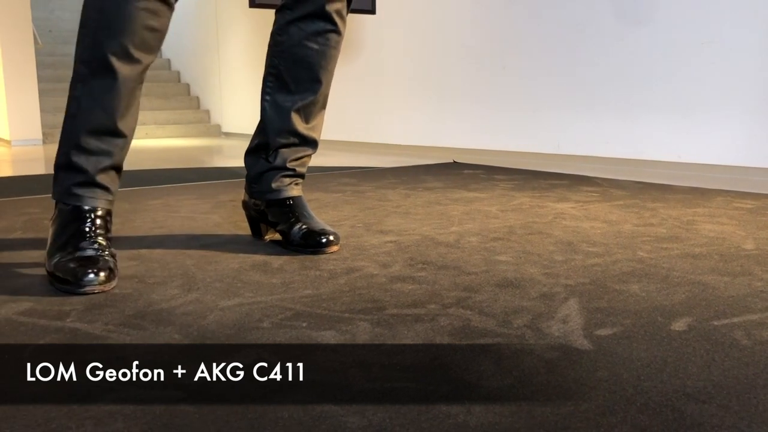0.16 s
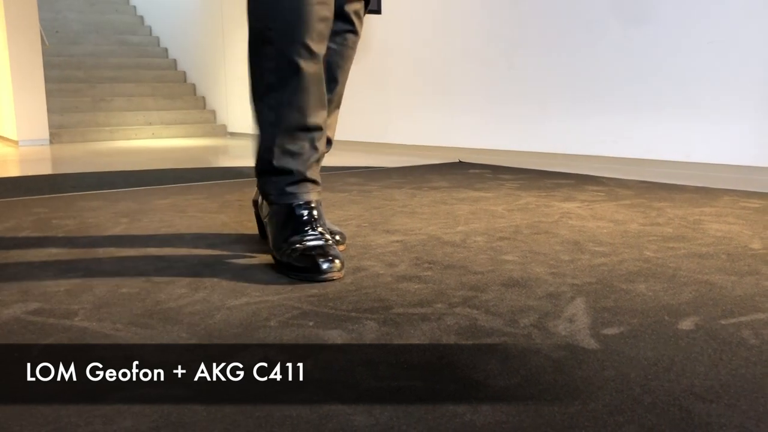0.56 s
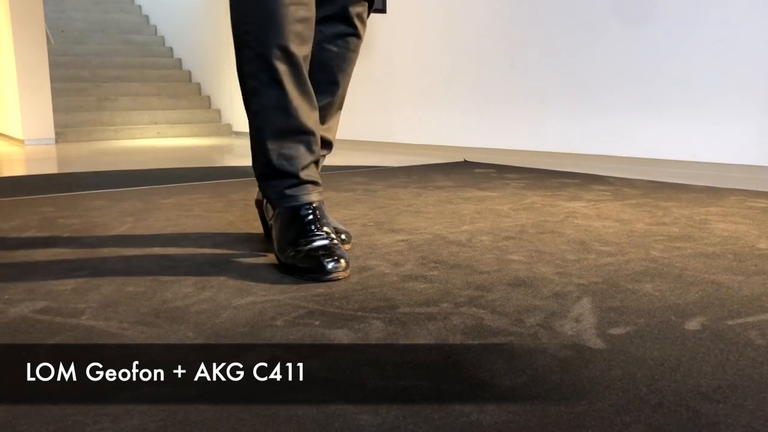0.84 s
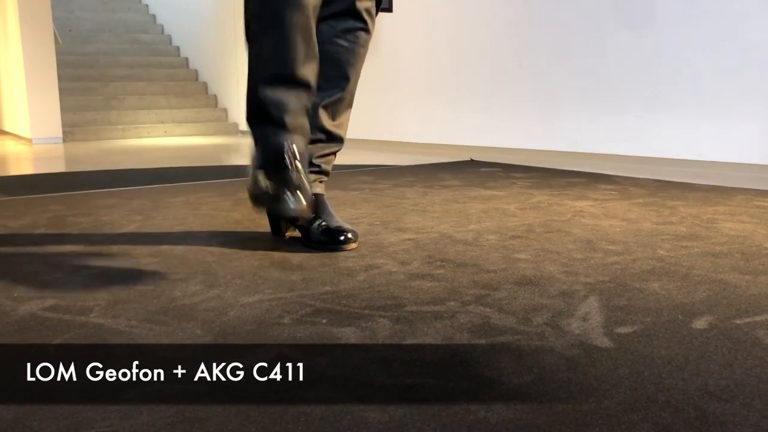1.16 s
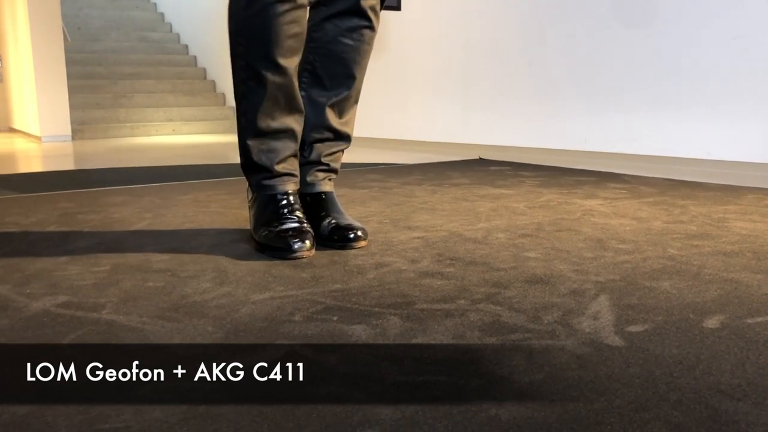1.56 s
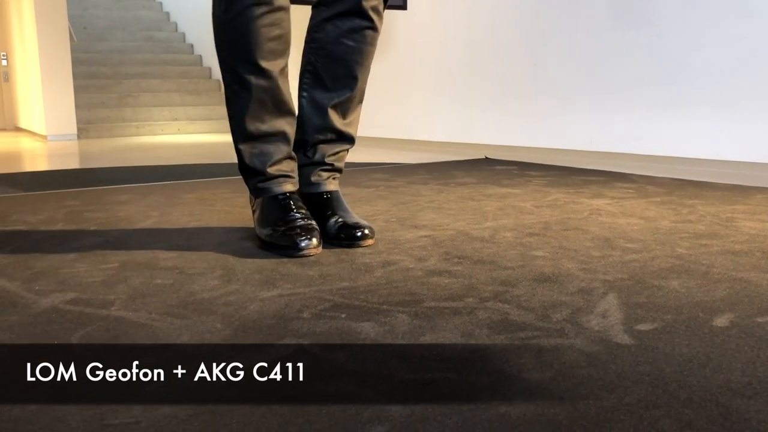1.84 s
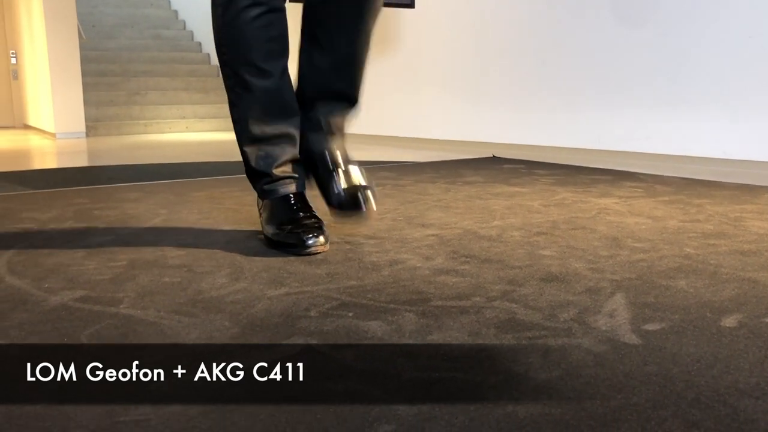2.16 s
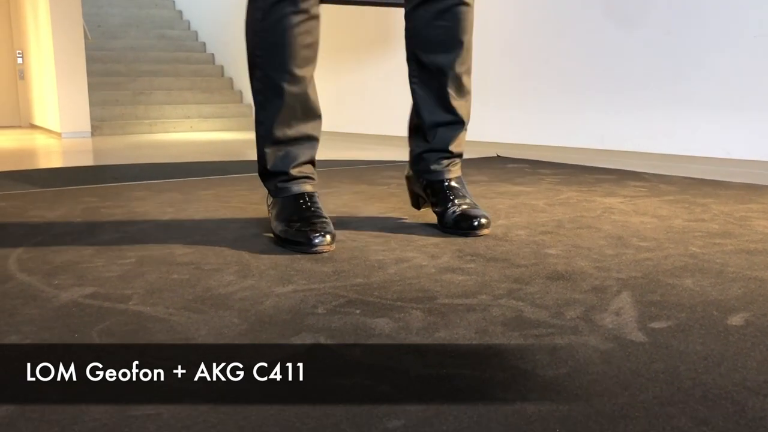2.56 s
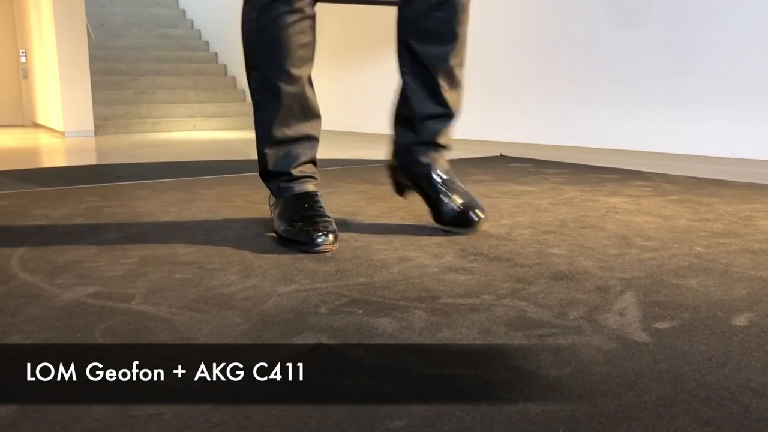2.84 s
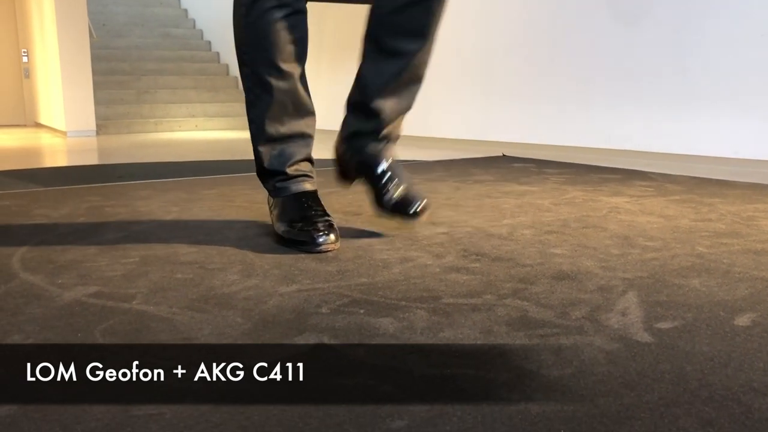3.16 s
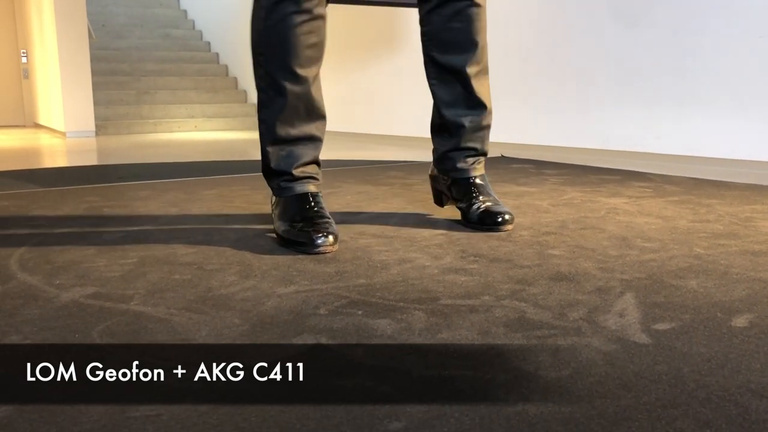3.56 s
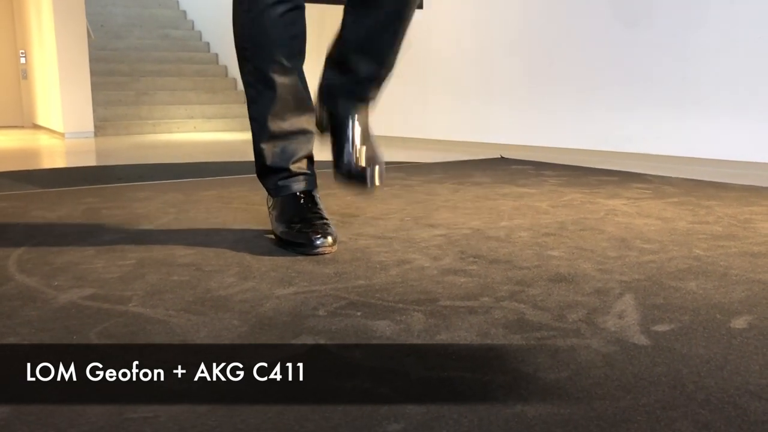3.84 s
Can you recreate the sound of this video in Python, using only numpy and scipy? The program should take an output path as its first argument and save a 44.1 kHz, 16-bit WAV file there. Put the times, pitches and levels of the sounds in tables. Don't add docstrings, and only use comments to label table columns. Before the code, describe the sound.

Hard-soled shoes stamp on a loose wooden panel, heard through contact pickups. A stamp's tail opens; sharp knocks with plate cracks and low, wobbling thumps land at 0.57, 1.43, 2.25, 2.53 (softest), 3.07, 3.36 and 3.93 seconds, the last hard and cut short. Between them come faint scuffs near 1.05 and 2.86, soft low steps around 1.0 and 1.9-2.0, tiny ticks and quiet rumble.

```python
import sys
import numpy as np
from scipy import signal
from scipy.io import wavfile

SR = 44100
rng = np.random.default_rng(int(sys.argv[2]) if len(sys.argv) > 2 else 0)


def digitize_waveform(pressure):
    field = np.atleast_2d(pressure).T
    bounded = np.clip(field, -1, 1)
    quanta = np.round(bounded * 32767).astype(np.int16)
    wavfile.write(sys.argv[1], SR, quanta)


def ratio_of_db(decibels):
    return 10 ** (np.asarray(decibels, float) / 20)


N = 176400

# start in seconds, peak in dB, knock in Hz, low shudder in dB, high buzz in dB.
STAMPS = [
    (-.04, -4, 890, -29, -63.5),
    (0.5669, -8.5, 1068, -25.5, -52.5),
    (1.4251, -10, 1047, -23.5, -48.5),
    (2.2524, -12.5, 850, -29, -59.5),
    (2.5323, -18, 878, -26, -56),
    (3.073, -11, 907, -26.5, -53.5),
    (3.3638, -13.5, 1150, -25, -58),
    (3.9326, -8.5, 1098, -25, -48.5),
]
KNOCK_EDGES_DB = [-15, -18.5, -16, -30, -31.5, -23, -19.5, -10]
# frequency in Hz, level in dB, T60 in seconds.
PANEL_MODES = [(280, -8.5, .05), (315, 2, 0.03), (454, -4, 0.0083), (667, -11, 0.075), (966, -6, 0.023)]
# frequency in Hz, density in dB per Hz.
SHUDDER_SPECTRUM = [(26, -30), (45, 5.5), (190, -1.5), (1340, -28.5), (3290, -37.5), (6080, -36.5),
                    (12600, -67), (16400, -87.5), (22000, -120)]
# frequency in Hz, T60 in seconds.
SHUDDER_T60 = [(100, 0.59), (250, 0.25), (600, .2), (1500, 0.12), (4000, 0.36), (14000, .14)]
# start in seconds, level in dB, frequency in Hz, T60 in seconds.
RINGS = [(.5675, -32.5, 612, 0.12), (.5675, -25.5, 1076, 0.039), (.582, -32.5, 1320, 0.049),
         (.619, -38, 1412, 0.056), (1.426, -25, 1174, 0.033), (1.426, -27.5, 524, 0.093),
         (1.426, -31, 928, 0.089), (2.2535, -20, 567, 0.062), (2.2535, -23.5, 1248, 0.018),
         (2.258, -34.5, 2177, 0.019), (2.297, -38, 1560, 0.018), (2.533, -22, 559.4, 0.073),
         (2.534, -30, 1193, 0.08), (2.541, -20.5, 600, 0.072), (2.576, -36.5, 1640, 0.022),
         (3.074, -24, 548, 0.11), (3.074, -31, 1200, 0.055), (3.365, -20, 557.4, 0.067),
         (3.365, -21, 700, 0.049), (3.365, -32.5, 1127, 0.05), (3.407, -40, 2277, 0.015),
         (3.934, -22, 562, 0.11), (3.934, -28.5, 1110, 0.046), (1.532, -57.5, 790, 0.35),
         (2.54, -66, 950, .9), (2.885, -76.5, 1190, 0.44), (3.08, -60, 800, .6), (2.657, -45.5, 620, 0.031),
         (3.83, -66.5, 360, .6), (3.688, -59.5, 700, .06), (1.883, -58, 545, 0.047),
         (1.964, -50.5, 367, .07), (1.98, -68.5, 588, 0.11)]
# centre in seconds, peak in dB, frequency in
# Hz.
HEAVES = [(.058, -26, 95), (0.101, -29.5, 107), (0.578, -43, 109), (0.6, -46, 120), (0.652, -17, 78),
          (0.694, -23, 81), (.726, -27.5, 90), (1.444, -20.5, 130), (1.462, -37, 129), (1.504, -46.5, 114),
          (1.553, -20, 79.6), (1.584, -31, 87.8), (1.533, -32, 376), (1.881, -48.5, 301), (1.887, -59, 514),
          (.004, -18.5, 66), (0.0203, -33.5, 127), (0.0134, -37, 150), (2.266, -17.5, 133.3),
          (2.286, -32, 107.9), (2.333, -20.5, 81.5), (2.38, -30.5, 93.2),
          (2.569, -23, 119), (2.614, -18.5, 90.5), (2.653, -24.5, 94), (2.661, -41.5, 318),
               (2.687, -30, 92.3), (3.092, -25, 117), (3.111, -28.5, 98.7), (3.155, -21.5, 95),
               (3.201, -24, 82.9), (3.238, -37.5, 81), (3.388, -30, 116), (3.42, -18.5, 104),
               (3.443, -17.5, 84), (3.485, -23, 88), (3.52, -26.5, 86.5), (3.624, -50, 419),
               (3.944, -30, 137), (3.969, -17.5, 130), (3.996, -24, 112)]
# start in seconds, peak in dB, dull part in dB.
CRACKS = [(0.0004, -44.5, -38.5), (0.0186, -53, -71), (0.0319, -46, -33.5), (0.035, -56, -44),
          (0.055, -62, -70), (0.5651, -39, -21.5), (0.5758, -35.5, -23), (0.5806, -39.5, -28.5),
          (0.6115, -52.5, -39.5), (0.617, -54, -39.5), (0.6267, -44, -30), (0.6467, -53.5, -37),
          (0.6679, -46, -38), (1.4242, -26, -21), (1.4323, -20.5, -22.5), (1.5084, -52, -63),
          (1.5232, -51, -34.5), (1.5316, -38, -30), (2.2565, -25, -35.5), (2.2967, -38, -34.5),
          (2.3244, -65, -66), (2.3605, -58.5, -75), (2.5375, -20.5, -22.5), (2.5615, -46.5, -42.5),
          (2.577, -39.5, -53), (2.585, -44.5, -30.5), (2.62, -56, -42), (2.6446, -62, -54.5),
          (2.6863, -64.5, -69),
          (3.0794, -22.5, -23.5), (3.1134, -35.5, -34), (3.1488, -44.5, -73), (3.1739, -51, -88),
               (3.363, -36.5, -30), (3.3689, -23, -24.5), (3.407, -44, -39.5), (3.3942, -28.5, -45),
               (3.4175, -44.5, -30), (3.453, -74, -40.5), (3.487, -58, -71.5), (3.5124, -60.5, -61),
               (3.931, -18, -17), (3.9366, -32.5, -19), (3.9628, -39, -26)]
# frequency in Hz, width in Hz, level in dB.
PLATE_MODES = [(4210, 390, -8.5), (6390, 280, -9)]
# start in seconds, peak in dB, frequency in Hz, T60 in seconds.
STEPS = [(0.244, -52, 184.2, 0.35), (0.25, -42, 71.6, 0.53), (.415, -58.5, 150, .4),
         (0.511, -54.5, 185, 0.3), (1.024, -42, 150, 0.32), (1.244, -65, 120, 0.32),
         (1.885, -47.5, 131.9, 0.67), (1.964, -42.5, 185, 0.29), (1.973, -44.5, 125, 0.41),
         (1.998, -44, 165, .3), (2.05, -45.5, 140, .2), (1.982, -50.5, 75, 0.99), (1.882, -49, 190, 0.16),
         (2.48, -44.5, 100.7, 0.12), (2.83, -48, 97.7, 0.37), (3.69, -59, 270, 0.29),
         (3.619, -45, 74, 0.26), (2.836, -47, 186.5, 0.25)]
# end in seconds, swell in seconds, level in dB.
SCUFFS = [
    (0.041, 0.007, -45),
    (0.288, 0.032, -59),
    (1.05, 0.033, -50.5),
    (2.005, 0.026, -64),
    (2.864, 0.033, -59.5),
    (3.692, 0.021, -55.5),
]
# frequency in Hz, density in dB per Hz.
SCUFF_SPECTRUM = [(180, -0.5), (300, -7), (800, -19.5), (1760, -27.5), (6860, -39.5), (12600, -66),
                  (16400, -84), (22000, -120)]
# start in seconds, peak in dB, frequency in Hz.
TICKS = [(.2618, -63.5, 4300), (0.4698, -66.5, 5010), (.508, -69.5, 4980), (.5506, -75, 5000),
         (.6864, -64, 4490), (0.703, -68, 3513), (0.7229, -64, 3500), (.7842, -74.5, 3020),
         (.857, -67.5, 2996), (1.1527, -64.5, 3048), (1.713, -63, 2870), (1.8794, -69.5, 2000),
         (1.929, -76, 5580), (1.9796, -75.5, 2800), (2.816, -65, 2863), (2.8389, -64.5, 2540),
         (3.0089, -69, 2000), (3.4981, -63, 2260), (3.5298, -67, 3990), (3.6593, -62, 2903)]
# frequency in Hz, level in dB.
SLAB_MODES = [(95, -44), (158, -49), (196, -49)]
# frequency in Hz, density in dB per Hz.
FLOOR_SPECTRUM = [(20, -11), (81, -3), (150, -5.5), (330, -23), (600, -28.5), (1200, -37.5), (12600, -61),
                  (16400, -89)]
# frequency in Hz, level in dB.
HUMS = [(1180, -99)]

STAMP_S = np.array(STAMPS)[:, 0]
KNOCK_WIDTH_CYCLES, KNOCK_EDGE_RATIO, KNOCK_RING_DB = 0.51, 2.4, -13.5
SPLIT_HZ, RISE_CYCLES, HOLD_S = 2200, 0.26, 0.027
PLATE_LAG_S, EARLY_BUZZ_DB, BUZZ_END_S = 0.005, -11, 0.042
LUMPS_PER_S, LUMPS_DB = 90, 3.6
RING_LONG_S, RING_LONG_DB, RING_FLUTTER_HZ, RING_FLUTTER = 0.3, -3, 35, 0.8
HEAVE_WIDTH_CYCLES, HEAVE_TRIM_DB = 0.65, 1.5
STEP_RISE_CYCLES, STEP_WOBBLE, STEP_GLIDE, STEP_GLIDE_S = 0.61, 0.25, 0.35, 0.012
SCUFF_END_S = 0.0037
TICK_T60_S, TICK_SPREAD_HZ, TICK_RING_DB = 0.011, 2200, -8
HALL_DB, HALL_T60_S, HALL_LOW_HZ, HALL_HIGH_HZ, SLAB_T60_S = -87.5, 1.9, 279, 2000, 0.37
HALL_PEAK_HZ, HALL_FALL_DB, HALL_SKIRT_HZ = 1200, 9, 600
HALL_FOLLOWS = 0.6
FLOOR_DB = -71.5
PICKUP_LOW_HZ, PICKUP_HIGH_HZ = 58, 12800


def rms_one(x):
    return x / np.sqrt(np.mean(x ** 2) + 1e-20)


def at_hz(points, hz):
    table = np.array(points)
    return np.interp(np.log(hz), np.log(table[:, 0]), table[:, 1])


def band(x, low_hz, high_hz):
    edges = [low_hz, min(high_hz, .45 * SR)]
    return signal.sosfilt(signal.butter(2, edges, "band", fs=SR, output="sos"), x)


def drift(rate):
    r = np.exp(-2 * np.pi * rate / SR)
    return rms_one(signal.lfilter([1], [1, -2 * r, r * r], rng.standard_normal(N + SR))[SR:])


def add(out, s, shape, before_s, after_s):
    i = np.arange(max(int((s - before_s) * SR), 0), min(int((s + after_s) * SR), N))
    out[i] += shape(i / SR - s)


def tone(hz, t):
    return np.sin(2 * np.pi * hz * t)


def dying(t, t60):
    return (t >= 0) * ratio_of_db(-60 * np.maximum(t, 0) / t60)


def bands(spectrum):
    edges = 28 * 2 ** np.arange(0, 9.6, .5)
    white = rng.standard_normal((2, N))
    centres = np.sqrt(edges[1:] * edges[:-1])
    noise = []
    for k, hz in enumerate(centres):
        noise.append(ratio_of_db(at_hz(spectrum, hz)) * band(white[k % 2], edges[k], edges[k + 1]))
    return centres, noise


def knocks():
    out = np.zeros(N)
    chance = rng.standard_normal((len(STAMPS), 2 * len(PANEL_MODES)))
    for (s, db, hz, _, _), edge_db, c in zip(STAMPS, KNOCK_EDGES_DB, chance):
        def dent(t):
            edge = ratio_of_db(edge_db) * np.cos(2 * np.pi * KNOCK_EDGE_RATIO * hz * t)
            pulse = np.exp(-(t * hz / KNOCK_WIDTH_CYCLES) ** 2)
            return -ratio_of_db(db) * (np.cos(2 * np.pi * hz * t) + edge) * pulse

        add(out, s, dent, .005, .005)
        for k, (mode_hz, mode_db, t60) in enumerate(PANEL_MODES):
            level = ratio_of_db(max(db, -12) + KNOCK_RING_DB + mode_db + 2 * c[k])
            struck_hz = mode_hz * (1 + .05 * c[-k - 1])
            add(out, s, lambda t: level * dying(t, t60) * (1 - np.exp(-(t / 0.00038) ** 2))
                * tone(struck_hz, t), 0, 2 * t60)
    return out


def shudder():
    hz, noise = bands(SHUDDER_SPECTRUM)
    low = hz < SPLIT_HZ
    out, lumps = np.zeros(N), drift(LUMPS_PER_S)
    high_scale = np.std(sum(n for n, is_low in zip(noise, low) if not is_low))
    low_scale = np.std(sum(n for n, is_low in zip(noise, low) if is_low))
    for f, n, is_low in zip(hz, noise, low):
        env, t60 = np.zeros(N), at_hz(SHUDDER_T60, f)
        rise = RISE_CYCLES / f + 0.00028
        for s, _, _, low_db, high_db in STAMPS:
            def swell_and_fall(t):
                fall_db = -60 * np.maximum(t - HOLD_S, 0) / t60
                if is_low:
                    level_db = low_db + fall_db
                else:
                    level_db = high_db + EARLY_BUZZ_DB * (t < PLATE_LAG_S) + fall_db - (t / BUZZ_END_S) ** 3
                return ratio_of_db(level_db) * (1 - np.exp(-t / rise))

            add(env, s, swell_and_fall, 0, 0.71 * t60)
        lumpy = ratio_of_db(LUMPS_DB * lumps * min(f / 1000, 1))
        out += env * n / (low_scale if is_low else high_scale) * lumpy
    return out


def rings():
    short, long = np.zeros(N), np.zeros(N)
    for s, db, hz, t60 in RINGS:
        add(long if t60 > RING_LONG_S else short, s,
            lambda t: ratio_of_db(db) * dying(t, t60) * (1 - np.exp(-t * hz)) * tone(hz, t), 0, 2 * t60)
    flutter = 1 + RING_FLUTTER * drift(RING_FLUTTER_HZ)
    return short + long * flutter * ratio_of_db(RING_LONG_DB)


def heaves():
    out = np.zeros(N)
    for s, db, hz in HEAVES:
        add(out, s, lambda t: ratio_of_db(db + HEAVE_TRIM_DB) * tone(hz, t)
            * np.exp(-(t * hz / HEAVE_WIDTH_CYCLES) ** 2), .04, .04)
    return out


def crack_part(low_hz, high_hz, t60, trim_db, dull=False, slope=1):
    env = np.full(N, 1e-9)
    for s, db, dull_db in CRACKS:
        nearest = np.abs(STAMP_S - s).argmin()
        alone = abs(STAMP_S[nearest] - s) > .003
        if dull and not alone:
            continue
        start = s if alone else STAMP_S[nearest] - 1 / 2000
        level = ratio_of_db((dull_db if dull else db) * slope + trim_db)
        fall_s = t60 if alone else .25 * t60
        add(env, start, lambda t: level * dying(t, fall_s), 0, 1.4 * t60)
    return band(env * rng.standard_normal(N), low_hz, high_hz) * np.sqrt(SR / 2 / (high_hz - low_hz))


def cracks():
    dull = crack_part(800, 2020, t60=.04, trim_db=-11, dull=True)
    middle = crack_part(2450, 5900, t60=.026, trim_db=-10)
    bright = crack_part(7500, 30000, t60=.012, trim_db=-13, slope=1.3)
    out = dull + middle + bright
    for hz, width, db in PLATE_MODES:
        out += ratio_of_db(db) * 2 * band(middle, hz - width / 2, hz + width / 2)
    return out


def steps():
    out = np.zeros(N)
    for s, db, hz, t60 in STEPS:
        def push(t):
            glide = STEP_GLIDE * STEP_GLIDE_S * np.exp(-t / STEP_GLIDE_S)
            return ratio_of_db(db) * (1 - np.exp(-t * hz / STEP_RISE_CYCLES)) * dying(t, t60) * tone(hz, t - glide)

        add(out, s, push, 0, t60)
    return out * (1 + STEP_WOBBLE * drift(30) + 0.19 * drift(55))


def scuffs():
    env = np.zeros(N)
    for s, swell, db in SCUFFS:
        add(env, s, lambda t: ratio_of_db(db) * np.where(t < 0, np.exp(-(t / swell) ** 2), np.exp(-t / SCUFF_END_S)),
            3 * swell, .04)
    grain = ratio_of_db(2.5 * drift(300))
    return env * grain * rms_one(sum(bands(SCUFF_SPECTRUM)[1]))


def ticks():
    ring, puff = np.zeros(N), np.zeros(N)
    for s, db, hz in TICKS:
        add(puff, s, lambda t: ratio_of_db(db) * dying(t, TICK_T60_S) * tone(hz, t), 0, .03)
        add(ring, s, lambda t: ratio_of_db(db + TICK_RING_DB) * dying(t, 2 * TICK_T60_S) * tone(hz, t), 0, .05)
    return ring + puff * rms_one(band(rng.standard_normal(N), 67, TICK_SPREAD_HZ))


def hall():
    modes = []
    for hz in np.linspace(HALL_LOW_HZ, HALL_HIGH_HZ, num=24) + rng.uniform(-30, 30, 24):
        skirt_hz = 550 if hz > HALL_PEAK_HZ else HALL_SKIRT_HZ
        modes.append((hz, HALL_DB - HALL_FALL_DB * ((hz - HALL_PEAK_HZ) / skirt_hz) ** 2, HALL_T60_S))
    modes += [(hz, db, SLAB_T60_S) for hz, db in SLAB_MODES]
    out, chance = np.zeros(N), rng.standard_normal((len(STAMPS), len(modes)))
    buzz_db = HALL_FOLLOWS * (np.array(STAMPS)[:, 4] + 55)
    at = ((STAMP_S + 1.01) * SR).astype(int)
    for (hz, db, t60), c in zip(modes, chance.T):
        clicks = np.full(N + SR, 1e-18)
        clicks[at] = ratio_of_db(db + (hz > 250) * buzz_db) * (1 + .5 * c)
        r, w = ratio_of_db(-60 / (t60 * SR)), 2 * np.pi * hz / SR
        resonator = [1, -2 * r * np.cos(w), r * r]
        out += signal.lfilter([0, np.sin(w)], resonator, clicks[SR // 2:])[SR // 2:]
    return out


def floor():
    out = ratio_of_db(FLOOR_DB) * rms_one(sum(bands(FLOOR_SPECTRUM)[1]))
    for hz, db in HUMS:
        out += ratio_of_db(db - 5.0 + 2 * drift(0.96)) * tone(hz, np.arange(N) / SR)
    return out


def scene():
    stamping = knocks() + shudder() + rings() + heaves() + cracks()
    between = steps() + scuffs() + ticks()
    return (stamping + between + hall() + floor())[None]


def top_cut(x):
    return signal.sosfilt(signal.butter(12, 16200, fs=SR, output="sos"), x)


def record(dry):
    x = signal.sosfiltfilt(signal.butter(1, PICKUP_LOW_HZ, "high", fs=SR, output="sos"), dry)
    x = signal.sosfilt(signal.butter(4, PICKUP_HIGH_HZ, fs=SR, output="sos"), x)
    return top_cut(x)


dry = scene()
out = record(dry)
digitize_waveform(out)
```